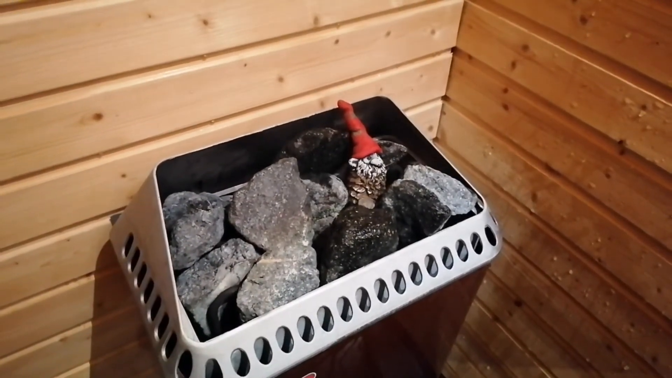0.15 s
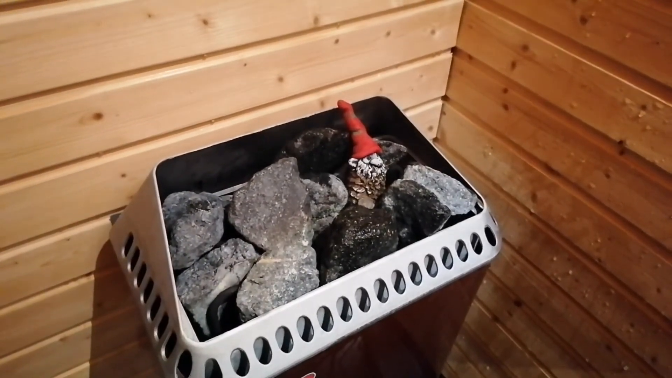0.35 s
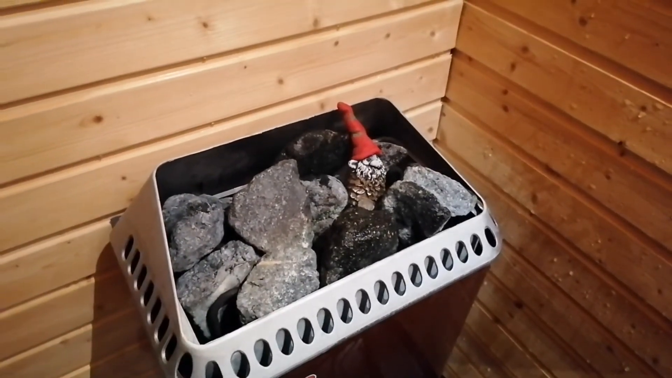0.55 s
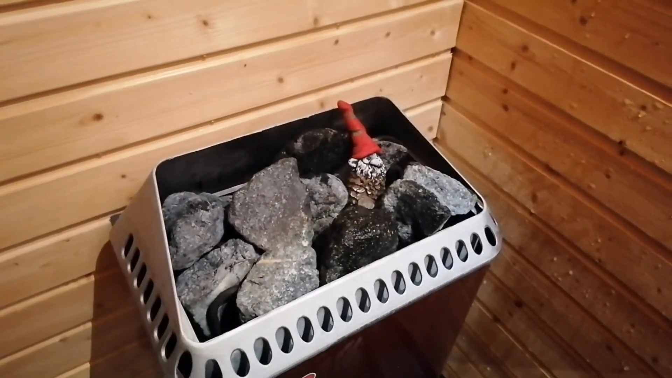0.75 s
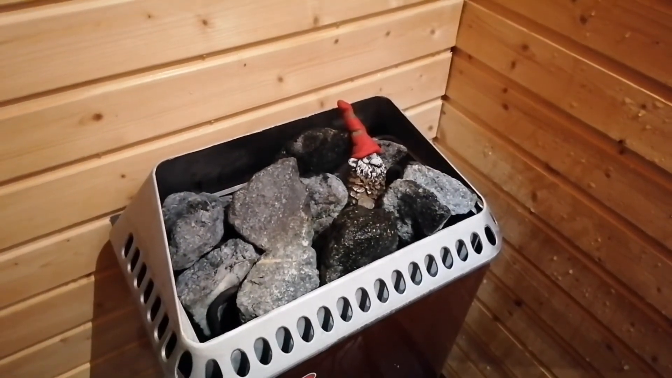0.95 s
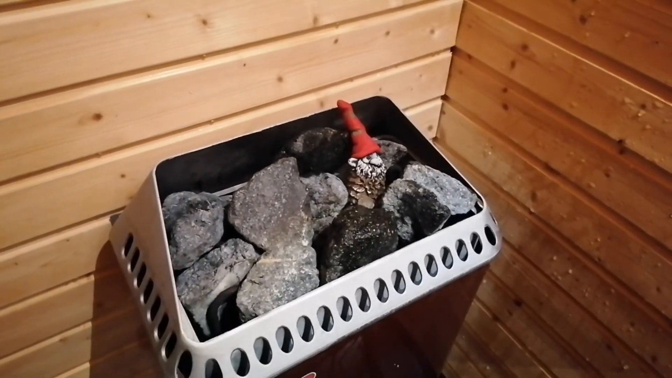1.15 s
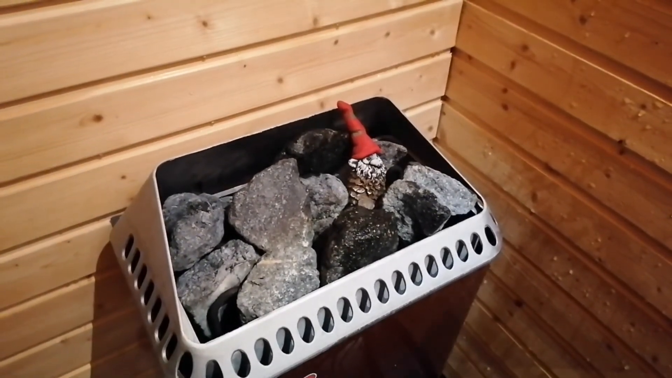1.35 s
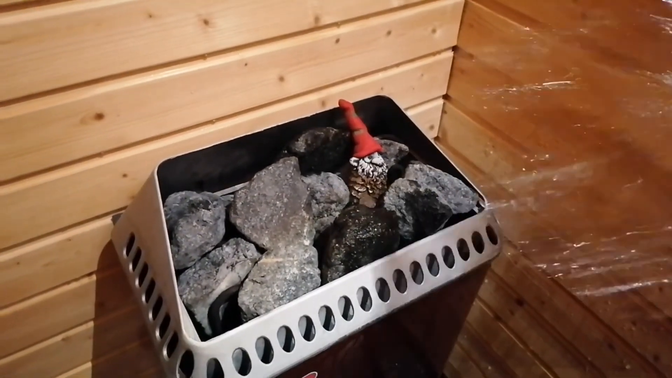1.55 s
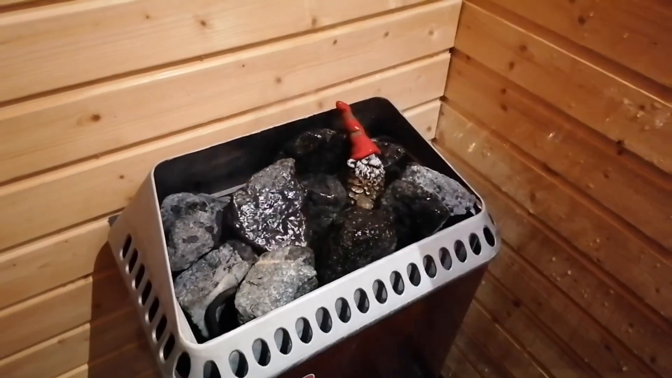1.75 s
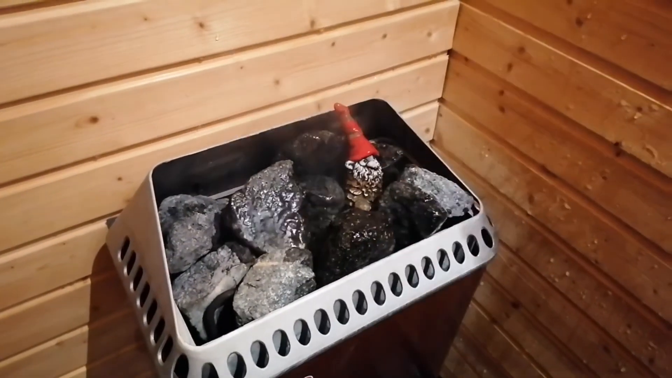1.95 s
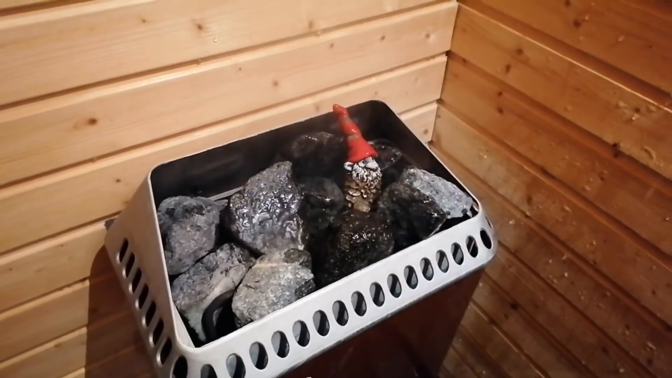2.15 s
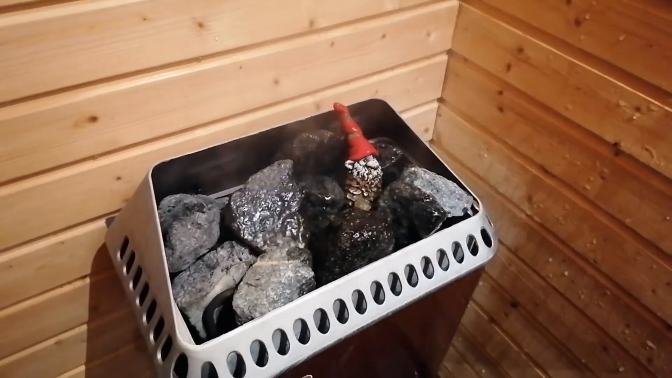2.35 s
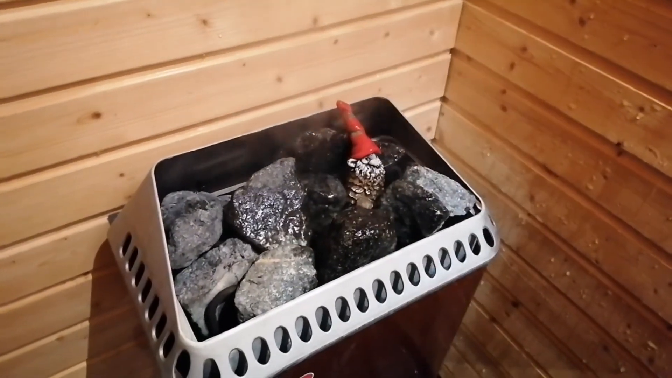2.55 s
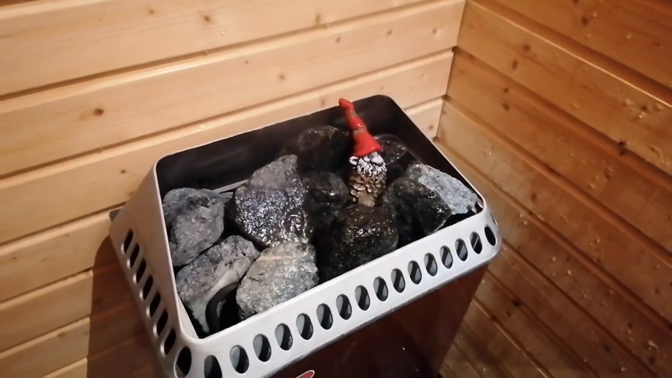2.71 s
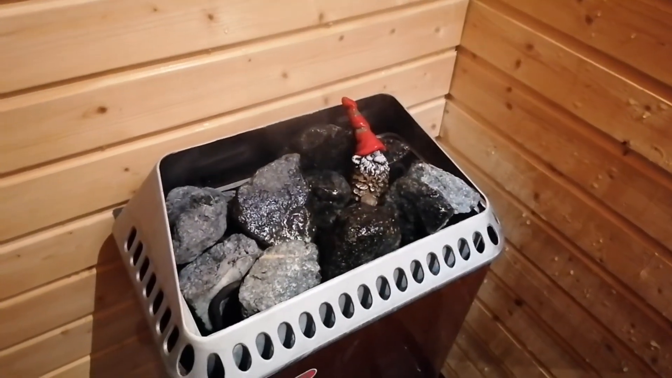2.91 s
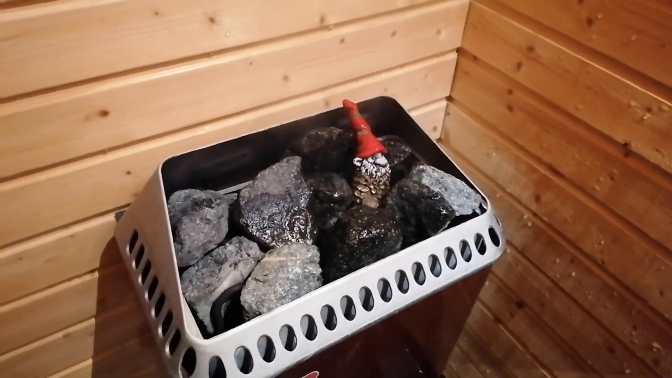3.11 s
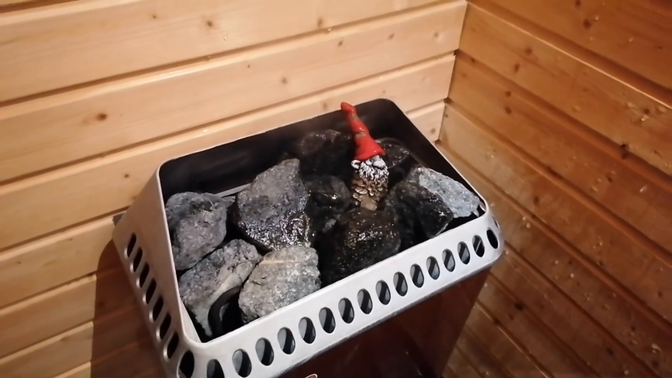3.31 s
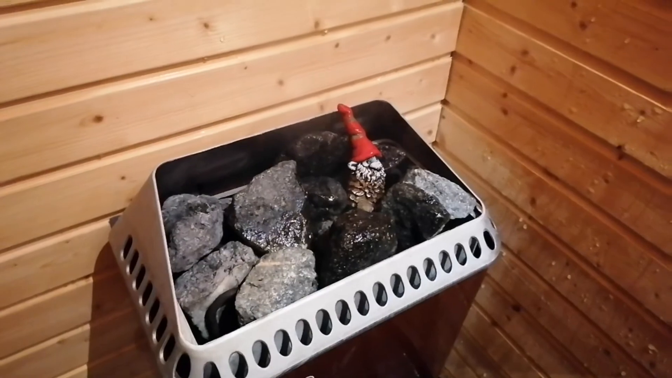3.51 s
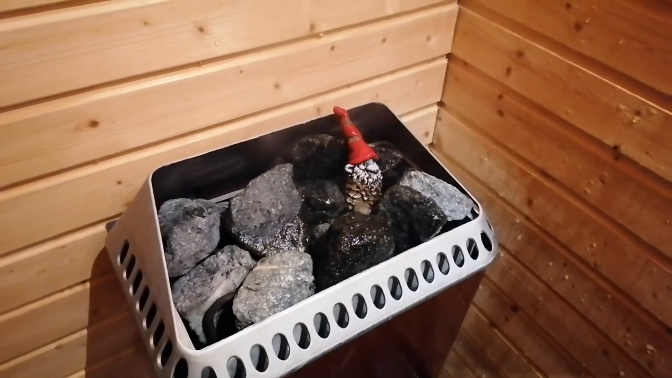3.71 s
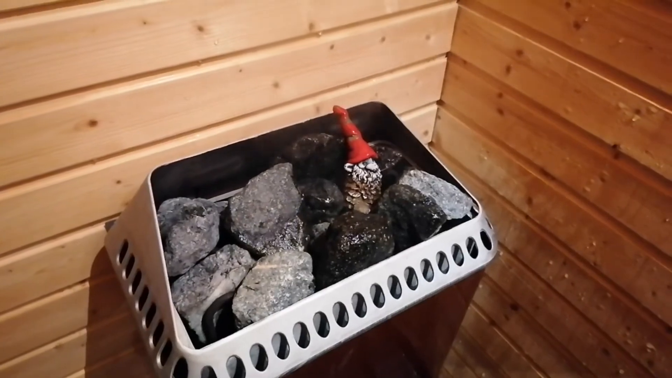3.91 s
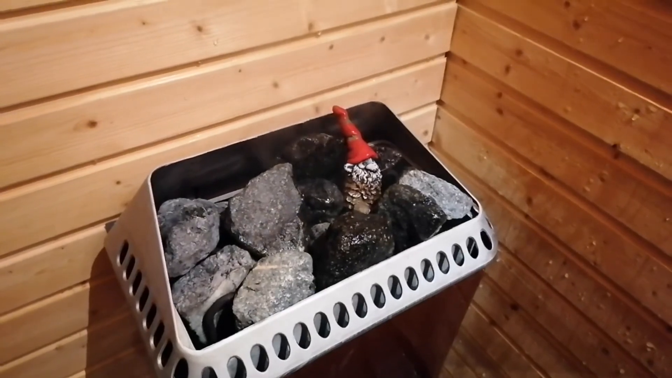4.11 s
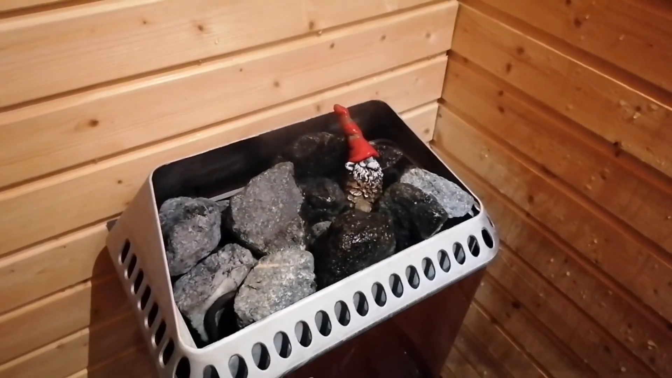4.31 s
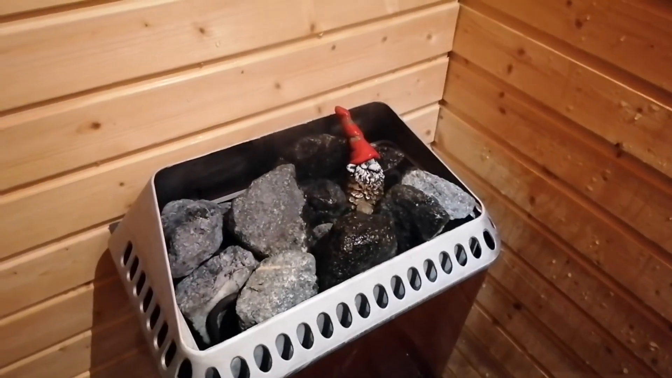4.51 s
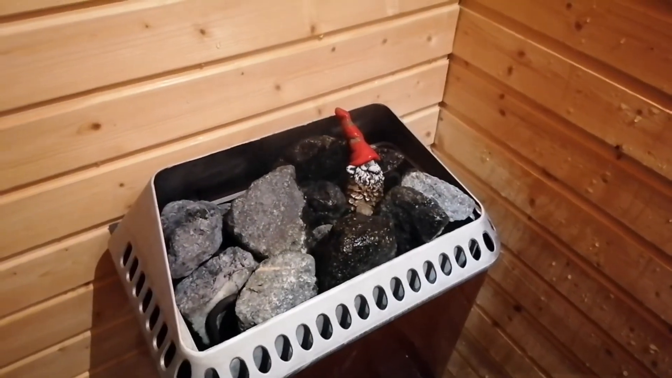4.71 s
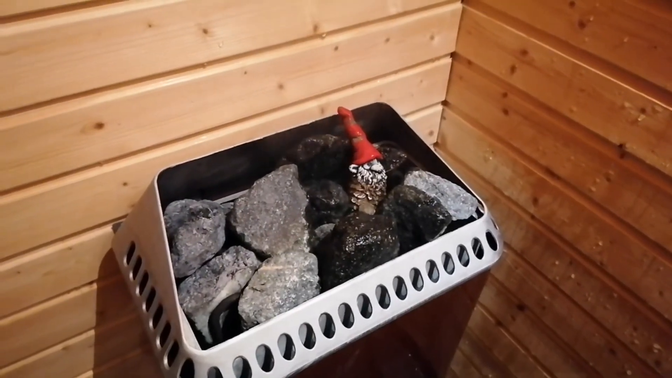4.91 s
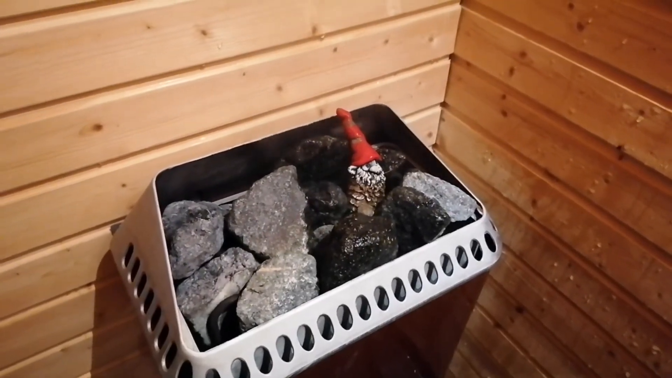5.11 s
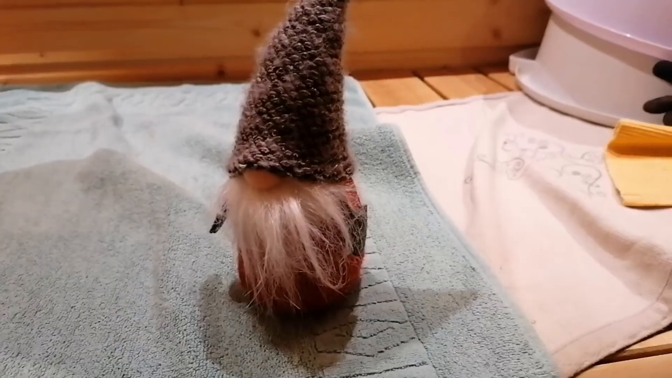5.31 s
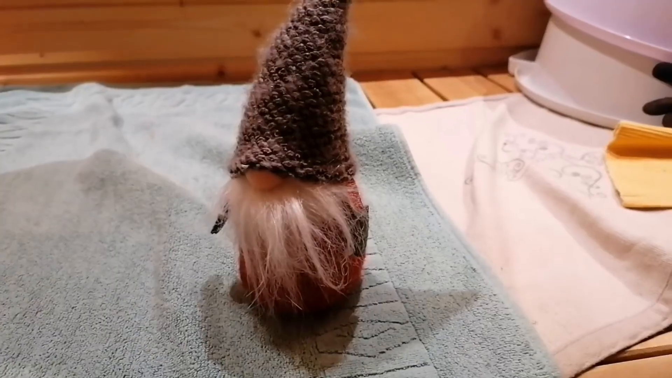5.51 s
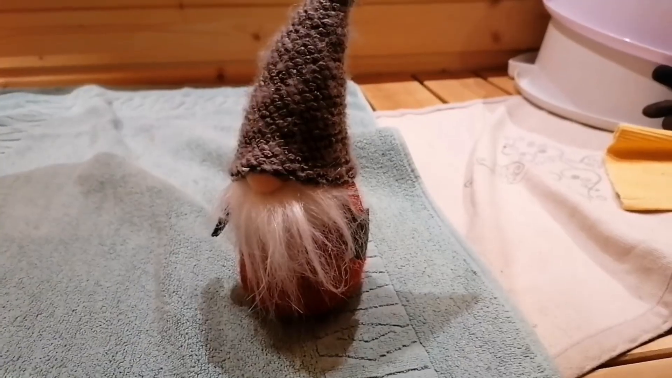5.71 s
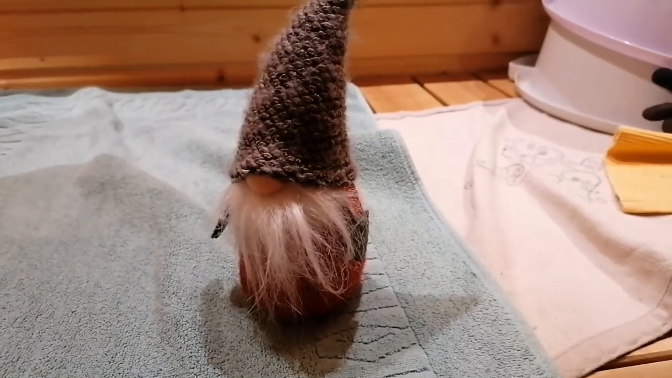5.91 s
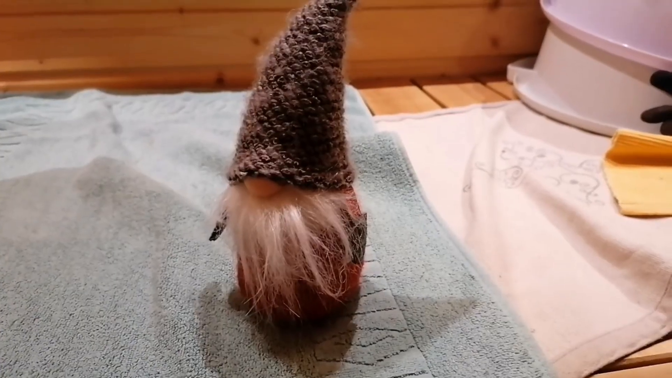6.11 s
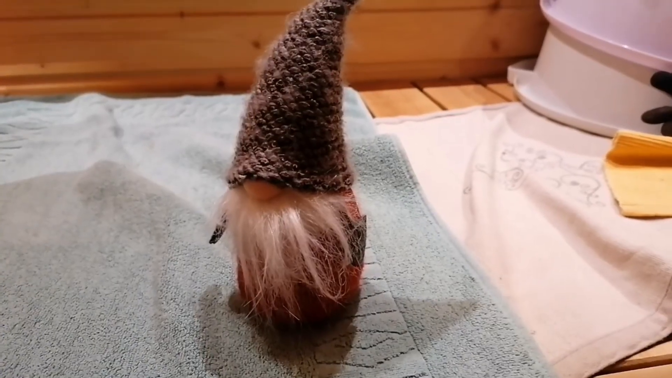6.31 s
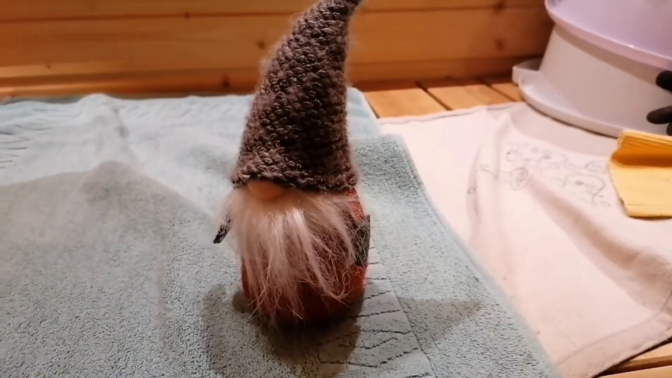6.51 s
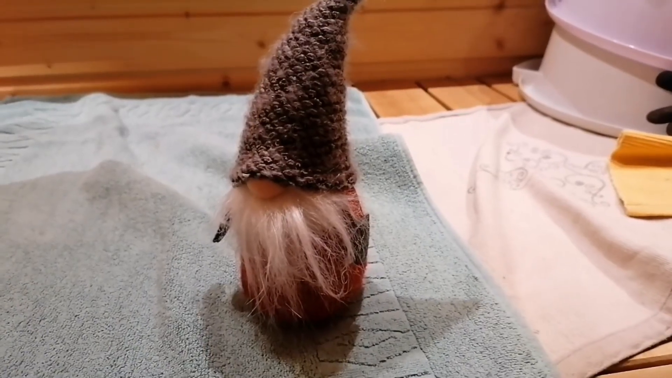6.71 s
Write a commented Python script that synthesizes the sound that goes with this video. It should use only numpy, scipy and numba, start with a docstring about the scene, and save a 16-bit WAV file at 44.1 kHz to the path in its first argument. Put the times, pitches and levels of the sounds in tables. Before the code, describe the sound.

Water slaps onto hot sauna stones and flares into loud hissing steam, with a squealing wooden scrape and knocks, then a click and duller hiss.

```python
"""Steam hisses on the hot stones of a sauna heater: bursting bubbles over smooth noise, from an old simmer.
A ladle of water lands, as slapping drops, a boom gliding upwards and a rumble; the new hiss flares and fades.
The ladle judders and the bucket scrapes, as slip pulses ringing modes, with a squeal of three jittery harmonics;
the bench knocks softly. Near the end the sound drops out briefly, a sharp click of damped sines follows on
the right, and a duller hiss takes over, with three faint, thin, wavering tones and a light tap."""
import sys
import numpy as np
from scipy import signal
from scipy.fft import rfft, irfft
from scipy.io import wavfile
from numba import njit

SR = 44100
rng = np.random.default_rng(int(sys.argv[2]) if len(sys.argv) > 2 else 0)


def unload_audio(sound):
    """Save the sound as a 16-bit wav file, at the path given as the first command line argument."""
    columns = np.transpose(np.atleast_2d(sound))
    # keep every value between -1 and 1, then stretch to whole-number steps
    steps = np.round(np.clip(columns, -1, 1) * 32767)
    wavfile.write(sys.argv[1], SR, steps.astype(np.int16))


N = 297675
TIME = np.arange(N) / SR
# the water is thrown; the sharp click comes and a duller hiss takes over (s)
THROW_S, CLICK_S = 1.6974, 5.2786
# Spectrum of the steam hiss. Each row: frequency in Hz, level per Hz in dB.
STEAM_COLOUR = [(30, -26.5), (140, -24.5), (195, -21.5), (255, -7), (410, -21.5), (510, -14), (1400, -9.5),
                (2000, -4.5), (2750, 1.06), (3400, -6), (5300, -6), (6500, -10.5), (8400, -11),
                (9400, -7.5), (11200, -17.5), (15000, -27.5)]


def undb(db):
    """Decibels to gain."""
    return 10 ** (np.asarray(db) / 20)


def unit(x):
    """Scale to rms 1."""
    return x / np.sqrt(np.mean(x ** 2))


def since(s):
    """Seconds gone by after a moment; zero before it."""
    return np.maximum(TIME - s, 0)


def walk(per_s):
    """Random values joined by straight lines, spread near 1."""
    return np.interp(TIME * per_s, np.arange(N // 20), rng.standard_normal(N // 20))


def pan(db):
    """Left and right gains for a left-minus-right level difference."""
    return undb(np.array([[.5], [-.5]]) * db)


def response(points):
    """A (Hz, dB) table at every frequency, joined on a log axis."""
    hz, db = np.transpose(points)
    return np.interp(np.log(np.maximum(np.fft.rfftfreq(N, 1 / SR), 1)), np.log(hz), db)


def colour(x, points):
    """Shape a steady sound by a (Hz, dB) spectrum; rms 1."""
    return unit(irfft(rfft(x) * undb(response(points)), N))


def ports(x, wide_hz=1100):
    """Two unrelated signals as a pair of microphones hears them: alike in the bass, unrelated in the treble."""
    f = np.fft.rfftfreq(N, 1 / SR)
    alike = .79 / (1 + (f / wide_hz) ** 4)
    mid, side = rfft(x) * np.sqrt([1 + alike, 1 - alike])
    return unit(irfft(np.array([mid + side, mid - side]), N))


def diffuse():
    """Smooth noise from all round."""
    return ports(rng.standard_normal((2, N)))


def pops(per_s, spread_db):
    """Random clicks, a few far louder than the rest, each with its own strength at either microphone."""
    size = undb(spread_db * np.minimum(rng.exponential(size=N), 6))
    struck = rng.random(N) < per_s / SR
    return unit(struck * size * rng.standard_normal((2, N)))


def room(x, wet_db, t60=.22):
    """The small panelled cabin: direct sound and a short dense tail, different at each microphone."""
    t = TIME[:SR // 3]
    tail = rng.standard_normal((2, len(t))) * undb(-60 * t / t60) * (t > .003)
    tail *= undb(wet_db) / np.sqrt(np.sum(tail ** 2, axis=1, keepdims=True))
    x = x * np.ones((2, 1))
    echoes = signal.fftconvolve(x, tail, axes=1)[:, :N]
    return (x + echoes) / np.hypot(1, undb(wet_db))


def envelope(start_s, attack_s, hold_s, fade_db_per_s):
    """Gain that rises evenly, holds, then fades at a steady rate."""
    fade_db = fade_db_per_s * since(start_s + attack_s + hold_s)
    return np.minimum(since(start_s) / attack_s, 1) * undb(-fade_db)


def surges(rows):
    """Joint gain of overlapping surges that each rise and fade."""
    power = [(undb(db) * envelope(s, attack_s, 0, fade)) ** 2 for s, db, attack_s, fade in rows]
    return np.sqrt(sum(power))


def stroke(start_s, length_s, attack_s, db, swell_db, release_db_per_s):
    """Gain of a push that swells to its last level and is then let go."""
    along = np.minimum(since(start_s) / length_s, 1)
    push = envelope(start_s, attack_s, length_s - attack_s, release_db_per_s)
    return push * undb(db - swell_db * (1 - along))


@njit
def resonate(x, hz, width):
    """State-variable band-pass with a moving centre."""
    y, b, l = np.empty(len(x)), 0., 0.
    for i in range(len(x)):
        g, k = np.tan(np.pi * hz[i] / SR), width / hz[i]
        v = (b + g * (x[i] + 1e-18 - l)) / (1 + g * (g + k))
        b, l, y[i] = 2 * v - b, l + 2 * g * v, k * v
    return y


def glide(start_s, length_s, first_hz, last_hz, db, swell_db, width_hz):
    """Two equal broad resonances in a row, driven by noise, slide in pitch by even ratios."""
    hz = first_hz * (last_hz / first_hz) ** np.minimum(since(start_s) / length_s, 1)
    ring = resonate(rng.standard_normal(N), hz, float(width_hz))
    ring = resonate(ring, hz, float(width_hz))
    return unit(ring) * stroke(start_s, length_s, attack_s=0.016, db=db, swell_db=swell_db, release_db_per_s=520)


def friction(start_s, push_row, modes, slips_per_s, run_up_s, sag, tuning, uneven, grit_db, low_cut_hz):
    """Uneven stick-slip pulses and fine grit ring a wooden body; slow rubbing is sparser, lower and duller."""
    run_out_s, slow_slips_per_s, slow_dull_db_per_octave = .12, 75, 1.5
    gain = stroke(start_s, *push_row)
    on = gain > 1e-4
    # the stroke gathers speed and runs out; slips come faster and the ring rises with speed
    stop_s = start_s + push_row[0]
    run_up = np.minimum(since(start_s) / run_up_s, 1) ** 2
    speed = run_up * np.maximum(1 - since(stop_s) / run_out_s, 0)
    per_s = slow_slips_per_s + (slips_per_s - slow_slips_per_s) * speed
    pitch_ratio = tuning * (1 - sag * (1 - speed)) * (1 + .008 * walk(50))
    # one slip at each whole turn of an uneven clock
    turns = np.floor(np.cumsum(per_s * np.exp(uneven * walk(300))) / SR)
    slip_size = undb(2.4 * rng.standard_normal(N)) / np.sqrt(per_s)
    slips = np.diff(turns, prepend=0) * slip_size
    push = unit(slips[on]) + undb(grit_db) * rng.standard_normal(N)[on]
    body = np.zeros((2, on.sum()))
    for k, (hz, width, mode_db, side_db) in enumerate(modes):
        # high modes radiate in lobes, so the two microphones may catch opposite signs
        lobes = np.array([[1], [(-1) ** k if hz > 1200 else 1]])
        dull_db = slow_dull_db_per_octave * (1 - speed[on]) * np.log2(hz / modes[1][0])
        ring = resonate(push, hz * pitch_ratio[on], float(width))
        body += (-1) ** (k // 2) * lobes * pan(side_db) * undb(mode_db - dull_db) * ring
    # a small wooden body radiates little below its lowest mode
    body = signal.sosfilt(signal.butter(4, low_cut_hz, "high", fs=SR, output="sos"), body)
    out = np.zeros((2, N))
    out[:, on] = unit(body) * gain[on]
    return out


def blows(rows, points, rise_s):
    """Coloured noise stands for the many close board modes each blow sets ringing, which die away together."""
    gain = np.zeros(N)
    for s, db, t60 in rows:
        age = since(s)
        decay = np.exp(-np.log(1000) * np.minimum(age / t60, 2))
        gain += undb(db) * (1 - np.exp(-age / rise_s)) * decay
    return colour(diffuse(), points) * gain


def boiling():
    """Left and right strength of the boil: the old simmer, plus the new water deep down and on each wet stone."""
    # Wet stones on top, each hissing until it dries. Each row: time of drying in seconds,
    # drying time in seconds, level in dB before the boil's envelope, left minus right in dB.
    wet_stones = [(4.08, .09, -39.5, -12), (4.58, 0.0398, -40.5, 14)]
    # an earlier throw is still simmering away
    simmer = pan(1.5) * undb(-51 - 2.5 * TIME)
    # water deep in the heater boils on
    power = (pan(-1) * undb(-37)) ** 2
    for dry_s, drying_s, db, side_db in wet_stones:
        wet = .5 - .5 * np.tanh((TIME - dry_s) / (2 * drying_s))
        power = power + wet * (pan(side_db) * undb(db)) ** 2
    # the new water flashes into steam, then boils down steadily
    flash_db = 3 * np.exp(-since(THROW_S) / 0.18)
    # the hiss dips briefly as the second splash rises
    dip_s, dip_width_s, dip_depth_db = 2.275, .075, -7.5
    dip_db = dip_depth_db * np.exp(-((TIME - dip_s) / dip_width_s) ** 2)
    fresh = envelope(THROW_S, attack_s=.05, hold_s=0, fade_db_per_s=1.69) * undb(flash_db + dip_db)
    return np.hypot(simmer, fresh * np.sqrt(power))


def steam():
    """Countless tiny bubbles burst on the stones over a smooth jet of steam; the gaps between the stones ring."""
    # Pinging bubbles in the puddles. Each row: frequency in Hz, level per Hz in dB.
    ping_colour = [(300, -26), (900, 0.5), (1400, -0.5), (2100, -5), (4000, -22.5), (12000, -44)]
    boil = boiling()
    crackle = ports(room(pops(per_s=5000, spread_db=3.0), wet_db=-1.5, t60=0.13))
    # at full boil the bursts merge into hiss; as the stones dry, single ones stand out
    boil_db = 20 * np.log10(boil.mean(axis=0))
    crackle_db = np.interp(boil_db, [-40, -34], [-2.5, -5.5])
    hiss = colour(diffuse() + undb(crackle_db) * crackle, STEAM_COLOUR)
    hiss += undb(-22) * colour(ports(pops(per_s=120, spread_db=1.5)), ping_colour)
    # close wooden walls comb the hiss with fine peaks and dips
    hiss = room(hiss, wet_db=-9.5, t60=0.032)
    # until the throw, the gaps ring less and less as the old water goes
    gaps = np.array([resonate(c, np.full(N, 2700.), 1500.) for c in hiss])
    ring_db = (1.5 - 2.2 * TIME) * (TIME < THROW_S)
    hiss = hiss + (undb(ring_db) - 1) * gaps
    flicker = undb(0.56 * walk(22))
    return hiss * boil * flicker * (TIME < CLICK_S)


def air():
    """Still air of the cabin: faint, steady, mostly low noise."""
    # Each row: frequency in Hz, level per Hz in dB.
    air_colour = [(20, 3.5), (70, -1.5), (160, -3.5), (300, -11), (900, -22.5), (4000, -43.5)]
    return colour(diffuse(), air_colour) * undb(-77)


def bench(thud_db=-6.0, thud_lag_s=0.0054, thud_ring=1.3):
    """Soft knocks on the boards; the floor below answers each with a later, longer, low thud."""
    # Each row: start in seconds, level in dB, ring (60 dB decay) in seconds.
    knocks = [(1.39, -61, 0.16), (1.52, -59.5, 0.24), (1.627, -53.5, 0.3), (2.811, -30.5, 0.21),
              (3.22, -47, 0.2), (3.916, -38, 0.18), (4.54, -46, 0.24)]
    # Spectra of boards and floor. Each row: frequency in Hz, level per Hz in dB.
    knock_colour = [(60, -35), (200, -14.5), (450, 0), (800, -5), (1250, -9), (1800, -30.5), (5000, -45.5)]
    thud_colour = [(30, -13.5), (105, -13), (155, 4.5), (215, -13), (400, -21), (1200, -51)]
    thuds = [(s + thud_lag_s, db + thud_db, t60 * thud_ring) for s, db, t60 in knocks]
    return blows(knocks, knock_colour, rise_s=0.0014) + blows(thuds, thud_colour, rise_s=0.0091)


def splash():
    """Drops slap the stones, the hollow casing booms upwards in pitch, and billows of steam rumble."""
    # Water landing, then rising steam. Each row: start in seconds, level in dB,
    # attack in seconds, fade in dB per second.
    splashes = [(1.7, -36, 0.12, 27), (2.25, -38.5, 0.072, 130)]
    billows = [(1.64, -53.5, 0.046, 11), (2.79, -56.5, 0.09, 24), (3.95, -63, 0.14, 9.5)]
    # Spectra of water and steam. Each row: frequency in Hz, level per Hz in dB.
    splash_colour = [(40, -23), (130, -8), (260, -3.5), (500, -6), (1200, -9), (3500, -10.5), (7000, -11),
                     (11000, -20), (15000, -27)]
    rumble_colour = [(20, -2), (55, -6), (80, 2.5), (110, -2.5), (155, -1), (205, -10.5), (400, -22.5),
                     (1500, -61.5)]
    # The casing's boom as water runs in: first and last pitch in Hz, last level and swell in dB, width in Hz.
    gush = (185, 407, -31, 13, 250)
    drops = ports(room(pops(per_s=900, spread_db=2.0), wet_db=-11.5)) + undb(-1.5) * diffuse()
    water = colour(drops, splash_colour) * surges(splashes)
    rumble = colour(diffuse(), rumble_colour) * surges(billows)
    rumble = rumble * undb(2 * walk(12)) * (TIME < CLICK_S)
    boom = glide(1.708, .18, *gush)
    return water + boom + rumble


def ladle():
    """The handle judders along the bucket; a rough squeal of three jittery harmonics sounds with it."""
    # The push of the hand: length and attack in seconds, last level and swell in dB, release in dB per second.
    ladle_stroke = (0.36, 0.05, -12.5, 9.5, 370)
    # Modes before tuning. Each row: frequency and width in Hz, level in dB, left minus right in dB.
    ladle_modes = [(600, 28, 3.5, -8.5), (708, 23, 6.5, -5), (763, 74, 2.5, -2.5), (884, 25, -1.5, 1.5),
                   (975, 30.2, -2, 4.5), (1058, 28, -0.5, 4), (1121, 34, 2.5, 0), (1230, 66, -6, 3),
                   (1443, 44.4, -3, 6), (1642, 110, -4.5, 8.5), (1885, 66, -2, 1.5), (1940, 40, -2, -5.5),
                   (2244, 81, -13.5, 6.5), (2523, 140, -11, 7.5), (3080, 310, -19, 4),
                   (3600, 400, -14, 0.5), (5230, 900, -30, 4.5), (7600, 810, -29, 2)]
    # The squeal's course. Each row: time in seconds, pitch in Hz before jitter,
    # level in dB before lift and flutter.
    squeal_course = [(1.89, 601.0, -34), (1.904, 586.6, -28.5), (1.92, 610.5, -13.5), (1.958, 651, -17),
                     (2.04, 617.8, -20.5), (2.126, 635, -14), (2.138, 629, -23), (2.172, 648.4, -25),
                     (2.182, 658, -13.5), (2.226, 624, -22), (2.27, 614, -36), (2.275, 620, -47)]
    judder = friction(1.816, ladle_stroke, ladle_modes, slips_per_s=470, run_up_s=.13, sag=0.054,
                      tuning=1.002, uneven=.4, grit_db=-12.0, low_cut_hz=543)
    s, course_hz, course_db = np.transpose(squeal_course)
    hz = np.interp(TIME, s, course_hz) * (1 + 0.013 * walk(220))
    phase = 2 * np.pi * np.cumsum(hz) / SR
    second = undb(-21.5) * np.sin(2 * phase)
    third = undb(-19) * np.sin(3 * phase) * undb(3 * walk(120))
    squeal_db = np.interp(TIME, s, course_db) + 2.5 + 1.1 * walk(130)
    sounding = (TIME >= s[0]) & (TIME <= s[-1])
    squeal = (np.sin(phase) * pan(-6.5) + second + third) * undb(squeal_db) * sounding
    return room(judder, wet_db=-4.5, t60=0.28) + room(squeal, wet_db=-16.5, t60=0.3)


def bucket():
    """A shorter, lower stick-slip scrape, with a groan that sinks as the bucket stops."""
    # The push: length and attack in seconds, last level and swell in dB, release in dB per second.
    bucket_stroke = (0.15, 0.09, -22, 10.5, 280)
    # Modes before tuning. Each row: frequency and width in Hz, level in dB, left minus right in dB.
    bucket_modes = [(420, 40, -3.5, -3), (575, 13.6, 3, 9.5), (756, 30, -0.5, -5), (850, 120, -13, 12),
                    (1148, 39, -2, -1), (1510, 84, -1, 7.5), (1680, 50, -8.5, -11), (2380, 70, -9.5, 7.5)]
    # The lowest groan: first and last pitch in Hz, last level and swell in dB, width in Hz.
    groan = (520, 348, -30, 5, 140)
    scrape = friction(2.265, bucket_stroke, bucket_modes, slips_per_s=280, run_up_s=.04, sag=0.0404,
                      tuning=1.012, uneven=.45, grit_db=-8.0, low_cut_hz=300)
    return room(scrape + glide(2.418, .067, *groan), wet_db=-6, t60=0.24)


def click(low_cut_hz=490, crack_db=-18, crack_s=0.00053):
    """A dry, thin snap right at one microphone: damped sines and a tiny burst of noise."""
    # Each row: frequency in Hz, level in dB before the click's own gain, 60 dB decay in seconds.
    click_modes = [(537, -27, 0.039), (880, -6.5, 0.0087), (1737, 2, 0.0088), (3490, -13, 0.0062)]
    age = np.clip(TIME - CLICK_S, 0, 1)
    ring = sum(undb(db - 60 * age / t60) * np.sin(2 * np.pi * hz * age) for hz, db, t60 in click_modes)
    crack = undb(crack_db) * rng.standard_normal(N) * np.exp(-age / crack_s) * (age > 0)
    snap = signal.sosfilt(signal.butter(6, low_cut_hz, "high", fs=SR, output="sos"), ring + crack)
    # nearly all on the right
    return snap * undb(-2) * np.array([[undb(-34)], [1]])


def dull_steam():
    """A smooth, duller sizzle of noise and faint pops, with three faint, thin, wavering tones."""
    # Each row: frequency in Hz, level per Hz in dB.
    dull_colour = [(60, -14.5), (220, -10.5), (330, -4.5), (700, -8.5), (900, -10.5), (985, 0.5),
                   (1100, -9), (1600, -4.5), (2100, -3.5), (3000, -0.5), (3800, -2), (5000, -5.5),
                   (8300, -10), (9600, -8), (11500, -14), (15000, -27)]
    # Thin wavering tones. Each row: start and end in seconds, first and last pitch in Hz before jitter,
    # peak level in dB.
    thin_tones = [(5.378, 5.695, 2086, 2090, -65), (5.502, 6.15, 3780, 3820, -67.5),
                  (6.052, 6.4, 9080, 11300, -75)]
    hold_s, fade_db_per_s = 0.57, 4.5
    fade_db = fade_db_per_s * since(CLICK_S + hold_s)
    sizzle = diffuse() + undb(-11) * ports(pops(per_s=1500, spread_db=1.5))
    hiss = colour(sizzle, dull_colour) * undb(-57.5 - fade_db)
    # it starts 3 dB down at the click and comes up gently
    hiss *= undb(-3 * np.exp(-since(CLICK_S) / .1))
    # one brief swell
    swell = envelope(5.925, attack_s=.03, hold_s=0, fade_db_per_s=299.5)
    hiss += colour(diffuse(), STEAM_COLOUR) * undb(-63) * swell
    for start, end, first_hz, last_hz, tone_db in thin_tones:
        along = np.clip((TIME - start) / (end - start), 0, 1)
        hz = first_hz + (last_hz - first_hz) * along + 28 * walk(400)
        tone = np.sin(2 * np.pi * np.cumsum(hz) / SR)
        hiss += undb(tone_db) * np.sin(np.pi * along) * tone
    return hiss * pan(-0.28) * (TIME >= CLICK_S)


def taps():
    """A light tap: a quick burst of bright noise that rings away."""
    # Each row: start in seconds, level in dB, ring (60 dB decay) in seconds.
    tap_rows = [(5.403, -45, 0.17)]
    # Each row: frequency in Hz, level per Hz in dB.
    tap_colour = [(100, -25), (800, -14), (1300, 5.5), (2000, 4), (3200, -2), (5000, -13), (12000, -36)]
    return blows(tap_rows, tap_colour, rise_s=.0005)


def scene():
    """Heater, ladle, bucket and bench together in the cabin."""
    heater = steam() + splash() + dull_steam()
    wood = bench() + ladle() + bucket() + taps()
    return heater + wood + click() + air()


def record(dry):
    """The ports colour each side, the sound drops out briefly, peaks clip at full scale and the top is cut."""
    # The two microphone ports ring differently. Each row: frequency in Hz, left minus right in dB.
    port_balance = [(150, -0.7), (1000, -0.5), (2400, 0), (2850, -6.5), (3200, -6), (3800, -4), (6500, 0),
                    (7700, 5.5), (9300, 4), (10400, -1), (12000, -3.5)]
    mute_from_s, mute_to_s, top_hz = 5.162, 5.222, 15300
    heard = irfft(rfft(dry) * pan(response(port_balance)), N)
    live = (TIME < mute_from_s) | (TIME > mute_to_s)
    held = np.clip(heard * live, -1, 1)
    return signal.sosfilt(signal.ellip(8, .2, 70, top_hz, fs=SR, output="sos"), held)


dry = scene()
out = record(dry)
unload_audio(out)
```